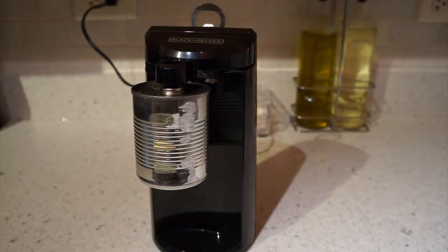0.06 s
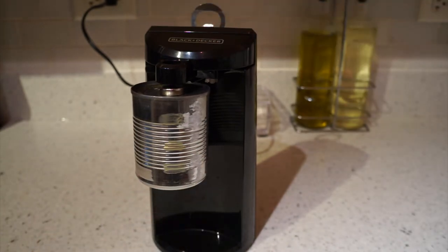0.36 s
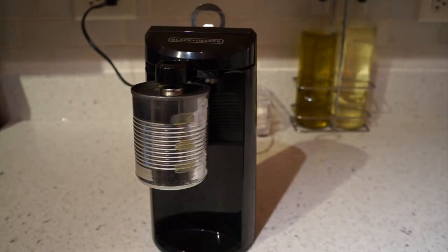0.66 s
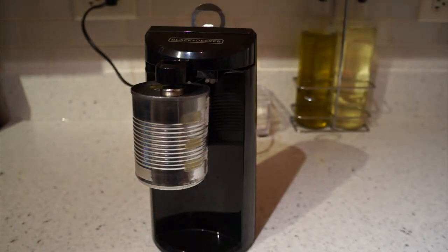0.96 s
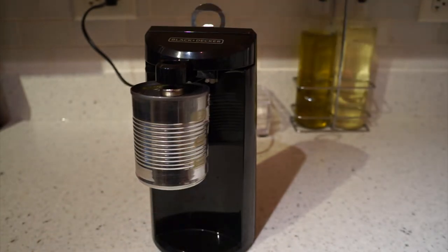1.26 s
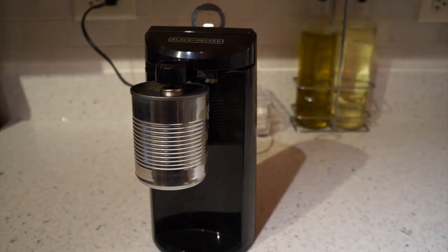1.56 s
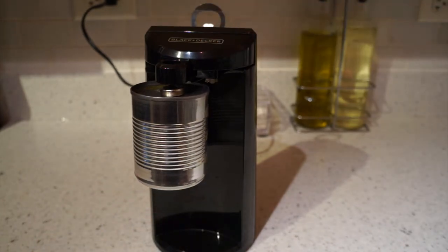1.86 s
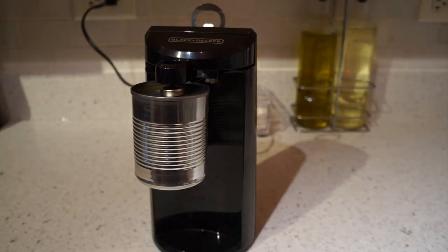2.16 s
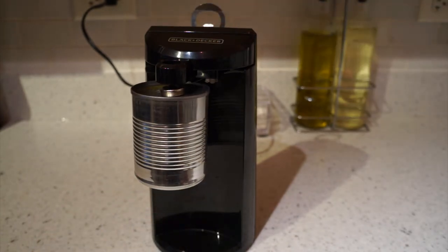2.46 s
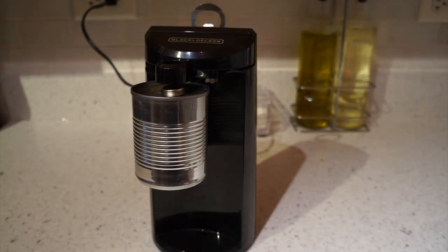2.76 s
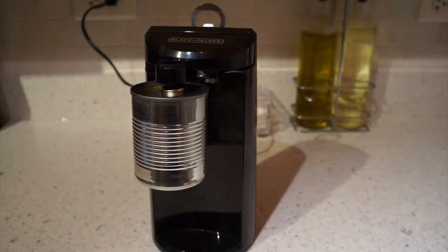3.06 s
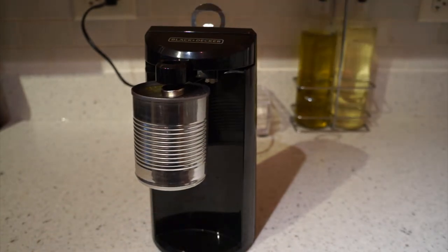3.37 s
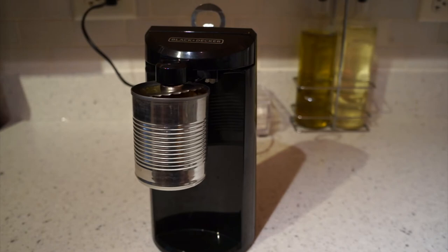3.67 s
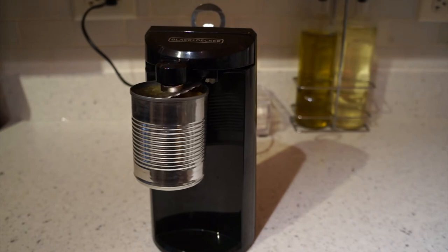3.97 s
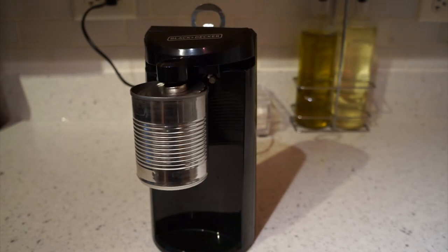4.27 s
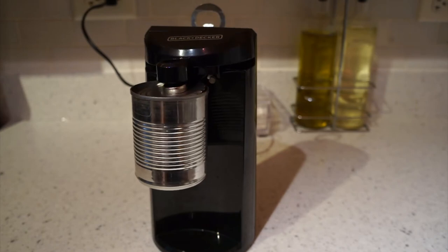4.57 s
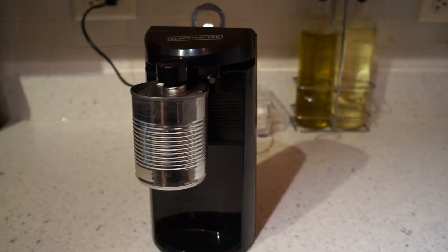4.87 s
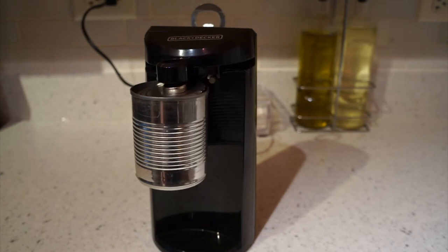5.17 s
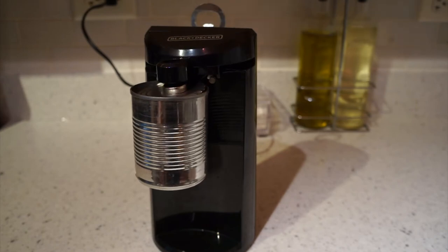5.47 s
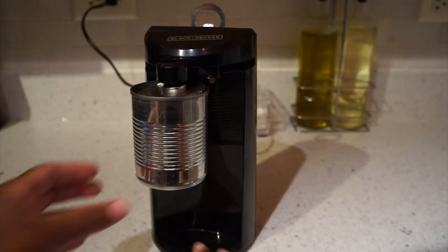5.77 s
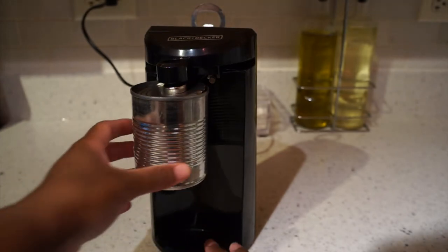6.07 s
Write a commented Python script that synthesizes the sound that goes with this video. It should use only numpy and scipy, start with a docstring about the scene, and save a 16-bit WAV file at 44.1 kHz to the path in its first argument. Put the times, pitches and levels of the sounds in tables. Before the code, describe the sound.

An electric can opener is already cutting a tin at the start, heard close up in a kitchen with short reflections. Its gears make a loud, fast rattle and a fluttering whine over a buzzing motor hum, all steady in pitch. The whine grows a little stronger from about 3 seconds. At 3.8 seconds the blade breaks the rim with a dry tick. At 4 seconds the lid snaps free with a bright crack and a short, thin steel ring, and the motor cuts out. The gears coast down with a falling whine, a loose, dulling rattle and a low rumble, stopping by about 5.8 seconds. Around 6 seconds a hand makes a few soft, dull knocks on the hollow plastic housing, the strongest just after 6.1 seconds, then briefly slides over it. Faint room tone lies underneath throughout.

```python
"""An electric can opener cuts a tin in a kitchen: its gear teeth rattle and whine, its mains motor hums.
The blade breaks the rim with a tick, the lid snaps free and rings, and the current stops.
The gears coast down with a falling whine and a low rumble.
Then a hand knocks on the hollow plastic housing and slides over it. Faint room tone lies under it all."""
import sys
import numpy as np
from scipy import signal
from scipy.fft import rfft, irfft, next_fast_len
from scipy.io import wavfile
from scipy.ndimage import uniform_filter1d, map_coordinates

SR = 44100
rng = np.random.default_rng(int(sys.argv[2]) if len(sys.argv) > 2 else 0)


def dump_mix(stems):
    """Bounce the given channels to the path in sys.argv[1] as a 16-bit WAV at rate SR."""
    frames = np.atleast_2d(stems).T  # one column per channel
    limited = np.clip(frames, -1, 1)  # hard clip at full scale
    pcm = np.round(limited * 32767).astype(np.int16)
    wavfile.write(sys.argv[1], SR, pcm)


N = 279153

# Shaft labouring in the cut. Each row: time in seconds, speed in turns per second.
CUTTING_SPEED = [(0.0, 53.48), (0.22, 53.29), (0.45, 53.52), (0.58, 53.3), (0.7, 53.37), (1.0, 53.46),
                 (1.2, 53.33), (1.55, 53.48), (1.74, 53.72), (1.92, 53.47), (2.36, 53.64), (2.52, 53.36),
                 (2.95, 53.36), (3.05, 53.58), (3.3, 53.66), (3.52, 53.56), (3.7, 53.73), (3.95, 53.76)]
# Tooth impacts under load. Each row: frequency in Hz, relative level in dB.
LOADED_SPECTRUM = [(15, -62), (40, -17), (90, -9.5), (170, -5), (370, 3), (520, -4), (740, -1.5), (1000, 5),
                   (1700, 0), (2700, -2.5), (3400, -2), (5200, -15.5), (7200, -22), (8500, -24.5),
                   (10800, -28.5)]
# Tooth impacts running free. Each row: frequency in Hz, relative level in dB.
FREE_SPECTRUM = [(40, -35), (120, -21.5), (220, -9.5), (320, -17.5), (410, -11.5), (520, -21.5),
                 (750, -13.5), (1000, -13), (1220, 0), (1340, -6.5), (1460, 0.5), (1560, -2), (1700, -12),
                 (1870, -2.5), (2020, -11), (2400, -18), (2540, -5), (2750, -9.5), (2950, -8), (3300, -13),
                 (4500, -26.5), (7000, -37.5), (10800, -48)]
# Housing resonances and dips. Each row: centre in Hz, width in Hz, gain in dB.
HOUSING_RESONANCES = [(198, 75, 11), (1080, 79, -7.5), (1294, 79, 13.5), (1560, 89, -1.5), (1733, 110, 3),
                      (1943, 180, 3.5), (2155, 65, 5.5), (2475, 220, -7), (3077, 125, 6), (3210, 175, 4.5),
                      (3756, 52, 8), (3983, 172, -11), (4450, 700, 3), (7250, 260, 7.5), (9860, 290, 2.5)]
# Gear tones under load. Each row: shaft multiple, level in dB.
LOADED_TONES = [(1, -57), (3, -51.5), (4, -45), (6, -42), (8, -39), (10, -51), (16, -33.5), (17, -49),
                (18, -31.5), (25, -34.5), (26, -53.5), (27, -47.5), (29, -54), (31, -38), (32, -40),
                (35, -46), (37, -66), (40, -36.5), (42, -41), (48, -49.5), (56, -40.5)]
# Whines in the cut. Each row: time in seconds, relative gear level in dB, magnetic contour in dB.
WHINE_LEVELS = [(0.03, -28.5, -27.5), (1.03, -35, -25.5), (1.18, -32, -26.5), (2.29, -30, -27),
                (2.8, -29.5, -26.5), (3.25, -23, -26), (3.56, -22.5, -27), (3.9, -25.5, -26.5),
                (3.95, -33, -37)]
# High teeth on the wheel. Each row: position in teeth, whine surge in dB, half length in seconds.
HIGH_TEETH = [(0, -17.5, .005), (8.5, -23.5, .003), (22.5, -22, .004)]
# Gear tones when coasting. Each row: shaft multiple, relative level in dB.
COASTING_TONES = [(5, -4), (8, -3), (16, -1), (24, 0.5), (26, -4), (32, -6), (40, -2.5), (42, -9), (48, -4),
                  (56, -7), (64, -9), (72, -5), (80, -9), (88, -10)]
# Low rumble of the coasting gears. Each row: frequency in Hz, relative level in dB.
RUMBLE_SPECTRUM = [(110, -36), (160, -26), (250, -12), (330, 9.5), (430, 2.5), (560, -6), (1000, -22),
                   (3000, -71.5)]
# Motor field tones. Each row: shaft multiple (rounded for pitch), mains multiple, base level in dB.
MAGNETIC_TONES = [(2, 0, -38), (0, 2, -45), (6, -2, -38), (0, 4, -40.5), (3, 2, -46), (0, 6, -38.5),
                  (0, 8, -57), (8.23, 2, -50), (0, 10, -40.5), (7.89, 4, -62), (16, 2, -36), (18, 2, -30.5),
                  (20, 2, -45), (31, 2, -49)]
# Blade breaking the rim. Each row: start in seconds, level in dB.
RIM_TICKS = [(3.7725, -17), (3.7759, -16)]
# Clamped rim. Each row: frequency in Hz, relative level in dB, T60 in seconds.
RIM_MODES = [(2050, -11, .035), (2966, -9, .05), (3650, -13, .04), (4650, -13, .05), (7300, -16, .06)]
# Lid and cutter snaps. Each row: start in seconds, level in dB, ring offset in dB.
LID_SNAPS = [(3.9775, -11, -2), (3.9823, -12.5, 2), (4.001, -13, 2.5)]
# Crack of steel. Each row: frequency in Hz, relative level in dB.
SNAP_SPECTRUM = [(100, -27), (900, -8), (1700, -3), (2300, 7.5), (3300, 5), (4500, 1), (6000, 0.5),
                 (7600, -1), (9000, -4), (10800, -5.5)]
# Lid and cutter ring. Each row: frequency in Hz, relative level in dB, T60 in seconds.
LID_MODES = [(2060, -1, .35), (2153, 2, .4), (2240, 1, .35), (2366, 4, .4), (2520, -1, .32), (2640, -3, .4),
             (3135, -1, .4), (3290, -2, .3), (3375, -1, .3), (3898, -7, .29), (4300, -9, .6),
             (5530, -20, 1.3), (6850, -1, .25)]
# Hand on the housing. Each row: start in seconds, level in dB.
HAND_KNOCKS = [(5.955, -49), (6.029, -37), (6.036, -32.5), (6.087, -36.5), (6.1012, -36.5), (6.143, -19.5)]
# Knock on plastic. Each row: frequency in Hz, relative level in dB.
KNOCK_SPECTRUM = [(40, -18), (100, 1), (220, -11), (330, -10), (480, -7), (700, -6), (1300, -3.5),
                  (1800, -11.5), (2700, -13.5), (4500, -23.5), (7500, -26), (11000, -40)]
# Hollow housing. Each row: frequency in Hz, relative level in dB, T60 in seconds.
HOLLOW_MODES = [(255, -20, .22), (320, -13, .28), (440, -17, .18), (620, -20, .12)]
# Skin on plastic. Each row: frequency in Hz, relative level in dB.
SLIDE_SPECTRUM = [(59, -34), (100, -8), (170, -13), (215, -23), (420, -7.5), (837, -36), (1020, -13.5),
                  (2570, -20), (11000, -31), (14300, -57), (22000, -120)]
# Room noise. Each row: frequency in Hz, relative level in dB.
ROOM_SPECTRUM = [(25, -12), (55, -7.5), (120, -14.5), (160, -1), (200, -10), (320, -7.5), (650, -21.5),
                 (1500, -25.5), (4000, -32), (7000, -38), (9700, -36), (11000, -38)]
# Steady room tones. Each row: frequency in Hz, level in dB.
ROOM_LINES = [(156, -62), (242, -59), (3908, -80)]
# Faint whistles. Each row: centre in seconds, half length in seconds, frequency in Hz, level in dB.
WHISTLES = [(5.22, .1, 9450, -73), (5.85, .11, 9400, -72), (5.89, .1, 5100, -75)]
# Stereo width. Each row: frequency in Hz, side gain in dB.
STEREO_WIDTH = [(40, -19), (90, -14), (250, -7.5), (550, -3), (1200, -4.5), (4500, -7.5), (8000, -19)]
# Stereo balance. Each row: frequency in Hz, left minus right in dB.
STEREO_BALANCE = [(50, -2.0), (900, -2.3), (1200, .3), (2000, -.2), (4000, .7), (10000, .3)]

MAINS_HZ, FULL_SPEED_RPS, SWITCH_OFF_S = 60, 53.533, 3.978
PINION_TEETH, WHEEL_TEETH = 8, 80


def gear_rattle(turns, speed_rps, powered, free_db, loaded_db=-24.5, tick_db=-26, soft_rps=13.7):
    """Tooth impacts ring the housing: hard under load, then loose and duller as the gears slow."""
    loaded = tooth_impacts(turns, speed_rps, wear_db=-0.33, jitter_db=0.04, backlash=1.0)
    loaded = rms_one(disperse(loaded, delay_s=0.003001) * tooth_load(turns))
    free = tooth_impacts(turns, speed_rps, wear_db=0.5, jitter_db=2.4, backlash=0.8)
    free = rms_one(disperse(free, delay_s=0.004))
    catches_s = np.flatnonzero(np.diff(np.floor(wheel_turns(turns)))) / SR
    ticks = bursts([(s, tick_db) for s in catches_s], t60_s=0.016)
    loaded = colour(powered * (loaded * from_db(loaded_db) + ticks), loaded_housing_db)
    loosened = ramp(start_s=2.8, length_s=0.55)  # the tin's thrum fades as the lid loosens
    loaded += lowpass(loaded, order=1, top_hz=307) * (from_db(-7.5 * loosened) - 1)
    free = shaped((1 - powered) * free * from_db(free_db), FREE_SPECTRUM)
    dull = lowpass(free, order=2, top_hz=1720)
    free = dull + (free - dull) * np.tanh((speed_rps / soft_rps) ** 2)
    return kitchen(loaded + free, near_db=-4, far_db=-4.5)


def tooth_impacts(turns, speed_rps, wear_db, jitter_db, backlash):
    """One impact per tooth; the wheel's wear pattern repeats and backlash adds a rebound."""
    at = np.flatnonzero(np.diff(np.floor(turns * PINION_TEETH)))
    tooth = np.arange(len(at)) % WHEEL_TEETH
    wear, polarity = rng.standard_normal((2, WHEEL_TEETH))
    jitter, lag, bounce = np.clip(rng.standard_normal((3000, 3))[:len(at)], -1.6, 1.6).T
    period_s = 1 / (PINION_TEETH * speed_rps[at])
    size = from_db(wear_db * wear[tooth] + jitter_db * jitter) * np.sqrt(period_s)
    firm = clicks(at / SR, size * np.sign(polarity[tooth]))
    rebound = clicks(at / SR + period_s * np.abs(lag) / 2, size * bounce)
    return rms_one(firm + backlash * rebound)


def tooth_load(turns, tight_tooth=54):
    """Tooth force buzzes at twice mains rate, pulses with the shaft and throbs with the oval wheel."""
    wheel = wheel_turns(turns)
    buzz_db = 1.4 * np.sin(2 * np.pi * 2 * MAINS_HZ * seconds_since(0))
    pulse_db = 0.8 * np.sin(2 * np.pi * wheel * WHEEL_TEETH / PINION_TEETH)
    oval_rad = 2 * np.pi * (wheel - tight_tooth / WHEEL_TEETH)
    throb_db = 0.8 * (np.cos(oval_rad) / 2 + np.cos(2 * oval_rad))
    return from_db(buzz_db + pulse_db + throb_db + 0.09 * drift(21.87))


def loaded_housing_db(hz):
    """Loaded impact spectrum through the housing's resonances."""
    resonance_db = sum(db / (1 + (2 * (hz - centre_hz) / width_hz) ** 2)
                       for centre_hz, width_hz, db in HOUSING_RESONANCES)
    return at_hz(LOADED_SPECTRUM, hz) + resonance_db


def disperse(x, delay_s):
    """The casing delays each frequency differently, smearing impacts without colouring them."""
    size = next_fast_len(N + SR // 4)
    hz = np.fft.rfftfreq(size, 1 / SR)
    delays_s = np.interp(hz, np.linspace(0, SR / 2, 300), delay_s * rng.exponential(1, 300))
    return irfft(rfft(x, size) * np.exp(-2j * np.pi * np.cumsum(delays_s) * SR / size), size)[:N]


def cutting_whine(turns, powered, whine_db, main_order=24, pressing_tooth=6.2):
    """Shaft harmonics; the main one flutters with the off-centre pinion and surges at high teeth."""
    unsteady = turns + 0.001 * drift(45)
    wheel, surge = wheel_turns(turns), 0
    for tooth, level_db, half_s in HIGH_TEETH:
        offset_turns = (wheel - tooth / WHEEL_TEETH + 0.5) % 1 - 0.5
        offset_s = offset_turns * WHEEL_TEETH / PINION_TEETH / FULL_SPEED_RPS
        surge += from_db(level_db) * bell(offset_s / half_s)
    flutter = 1 + 0.55 * np.cos(2 * np.pi * (wheel * WHEEL_TEETH - pressing_tooth) / PINION_TEETH)
    steady = flutter * from_db(whine_db - 1.5 + 1.6 * drift(70))
    surge *= from_db(2.3 * drift(9.65))
    out = tone(main_order * unsteady, np.hypot(steady, surge), spread_rad=0.26)
    for order, level_db in LOADED_TONES:
        out += tone(order * unsteady, from_db(level_db + 1.3 * drift(21.86)), spread_rad=0.39)
    return powered * out


def coasting_whine(turns, speed_rps, free_db, critical_rps=30.3, width_rps=1.3, rise_s=0.15):
    """Mesh harmonics glide down through the housing's resonances and swell at a critical speed."""
    singing_db = free_db + 3.8 + 5.5 / (1 + ((speed_rps - critical_rps) / width_rps) ** 2)
    out = 0
    for order, level_db in COASTING_TONES:
        resonance_db = 1.19 * at_hz(FREE_SPECTRUM, order * speed_rps)
        gain = from_db(singing_db + level_db + resonance_db + 2.6 * drift(35))
        backlash_cycles = 0.15 * drift(60)
        out += tone(order * turns + backlash_cycles, gain, spread_rad=0.29)
    return (1 - np.exp(-seconds_since(SWITCH_OFF_S) / rise_s)) * out


def coasting_rumble(turns, speed_rps, powered, crawl_rps=9.3, width_rps=7.5):
    """Low rumble of the coasting gears: it fades, then swells at 300-450 Hz as they slow to a crawl."""
    throb = 1 + 0.2 * np.sin(2 * np.pi * turns)
    crawl = bell((speed_rps - crawl_rps) / width_rps) * np.tanh(speed_rps)
    gain = from_db(-39.5) * (speed_rps / FULL_SPEED_RPS) ** 3.7 + from_db(-45.5) * crawl
    rumble = shaped(rng.standard_normal(N) * throb * (1 - powered) * gain, RUMBLE_SPECTRUM)
    return kitchen(rumble, near_db=-27, far_db=-24)


def coasting_db(turns, speed_rps, knee_rps=31):
    """Free gear level: the rotor shakes the teeth once a turn; below the knee they stop bouncing."""
    return -28 - 20 * np.log10(1 + (knee_rps / speed_rps) ** 2.36) + 0.5 * np.sin(2 * np.pi * turns)


def shaft_speed_rps(drag_s=1.54, friction_rps_per_s=14.6):
    """The shaft wavers on uneven steel; after switch-off, drag and dry friction stop it."""
    cutting = in_time(CUTTING_SPEED)[0] + 0.06 * drift(20)
    off_s = seconds_since(SWITCH_OFF_S)
    braking_rps = friction_rps_per_s * drag_s
    coasting = (FULL_SPEED_RPS + braking_rps) * np.exp(-off_s / drag_s) - braking_rps
    return np.where(off_s > 0, np.maximum(coasting, 1e-3), cutting)


def wheel_turns(turns, catch_s=1.206):
    """Turns of the big wheel, a whole number whenever its highest tooth meshes."""
    return (turns - np.interp(catch_s * SR, np.arange(N), turns)) * PINION_TEETH / WHEEL_TEETH


def motor_hum(turns, powered, magnetic_db):
    """The field pulls at even mains multiples, shifted by shaft multiples; load lifts the high tones."""
    mains_cycles = MAINS_HZ * seconds_since(0)
    load_db = 3 + 1.9 * (magnetic_db - np.average(magnetic_db, weights=powered))
    out = 0
    for order, multiple, level_db in MAGNETIC_TONES:
        gain = powered * from_db(level_db + load_db * (order > PINION_TEETH) + 1.43 * drift(12))
        out += tone(round(order) * turns + multiple * mains_cycles, gain, spread_rad=0.62)
    return out


def rim_tick():
    """The blade breaks the last strip of rim: a dry double tick with a short steel ring."""
    crack = shaped(from_db(-1) * bursts(RIM_TICKS, t60_s=0.012), SNAP_SPECTRUM)
    return kitchen(crack + struck(RIM_TICKS, RIM_MODES), near_db=-6, far_db=-8)


def lid_snaps():
    """Lid and cutter snap: bright cracks, then the shimmer and modes of thin steel."""
    hits = [(s, db) for s, db, _ in LID_SNAPS]
    rings = [(s, db + ring_db) for s, db, ring_db in LID_SNAPS]
    crack = from_db(-1.5) * bursts(hits, t60_s=0.019)
    shimmer = from_db(-15.5) * bursts(rings, t60_s=0.37)
    ring = from_db(-25.5) * struck(rings, LID_MODES)
    return kitchen(shaped(crack + shimmer, SNAP_SPECTRUM) + ring, near_db=-6, far_db=1)


def hand(slide_s=6.145, attack_s=0.047, fade_db_per_s=31):
    """Dull knocks ring the hollow plastic housing, then skin slides over it."""
    thuds = from_db(-2) * bursts(HAND_KNOCKS, t60_s=0.038)
    tails = from_db(-20.5) * bursts(HAND_KNOCKS, t60_s=0.3)
    knocks = shaped(thuds + tails, KNOCK_SPECTRUM) + struck(HAND_KNOCKS, HOLLOW_MODES)
    slide_db = -42 - fade_db_per_s * seconds_since(slide_s + attack_s) + 0.98 * drift(79)
    friction = ramp(slide_s, attack_s) * from_db(slide_db) * rng.standard_normal(N)
    return kitchen(knocks + shaped(friction, SLIDE_SPECTRUM), near_db=-3.5, far_db=-9)


def kitchen(x, near_db, far_db):
    """Direct sound, quick reflections off counter and wall, and the room's tail."""
    near = from_db(near_db) * scatter(x, t60_s=0.055)
    far = from_db(far_db) * scatter(x, t60_s=0.43)
    return x + near + far


def scatter(x, t60_s):
    """Dense reflections: convolution with decaying stereo noise, level across bands."""
    size = SR // 2
    tail = rfft(rng.standard_normal((2, size)) * from_db(-60 * np.arange(size) / SR / t60_s))
    tail /= np.sqrt(uniform_filter1d(np.abs(tail) ** 2, size=60, axis=1) + 1e-9)
    return signal.fftconvolve(np.atleast_2d(x), irfft(tail)[:, :size - SR // 20], axes=1)[:, :N]


def room_tone():
    """Low rumble, thin hiss, faint steady tones and brief whistles."""
    time_s = seconds_since(0)
    noise = rng.standard_normal(N) + 0.94 * rng.standard_normal((2, N))
    out = from_db(-52) * shaped(noise, ROOM_SPECTRUM)
    for hz, db in ROOM_LINES:
        out += tone(hz * time_s, from_db(db + 1.8 * drift(4.2)), spread_rad=0.086)
    for centre_s, half_s, hz, db in WHISTLES:
        gain = from_db(db) * bell((time_s - centre_s) / half_s)
        out += tone(hz * time_s + drift(20), gain, spread_rad=0.086)
    return out


def tone(cycles, rms, spread_rad):
    """Stereo sine, its phase offset in opposite directions left and right."""
    offset_rad = spread_rad * rng.choice([-1, 1]) * np.array([[1], [-1]])
    return np.sqrt(2) * rms * np.sin(2 * np.pi * (cycles + rng.random()) + offset_rad)


def clicks(times_s, sizes):
    """One impulse per contact."""
    return np.bincount((times_s * SR).astype(int), sizes, N)[:N]


def bursts(hits, t60_s):
    """A decaying noise burst per hit."""
    times_s, levels_db = np.transpose(hits)
    decay = from_db(-60 / (t60_s * SR))
    envelope = signal.lfilter([1], [1, -decay], clicks(times_s, from_db(levels_db)) + 1e-18)
    return envelope * rng.standard_normal(N)


def struck(hits, modes):
    """Each hit rings a set of damped modes."""
    times_s, levels_db = np.transpose(hits)
    age_s = np.arange(SR) / SR
    ring = sum(from_db(db - 60 * age_s / t60_s) * np.sin(2 * np.pi * hz * age_s)
               for hz, db, t60_s in modes)
    return signal.fftconvolve(clicks(times_s, from_db(levels_db)), ring)[:N]


def colour(x, db_at):
    """Minimum-phase filter of shape db_at(hz) and unit power gain."""
    size = next_fast_len(N + SR // 4, real=True)
    size += size % 2
    gain = rms_one(from_db(db_at(np.fft.rfftfreq(size, 1 / SR))))
    cepstrum = irfft(np.log(gain))
    cepstrum[1:size // 2] *= 2
    cepstrum[size // 2 + 1:] = 0
    return irfft(rfft(x, size) * np.exp(rfft(cepstrum)))[..., :N]


def shaped(x, spectrum):
    """Filter by a spectrum table."""
    return colour(x, lambda hz: at_hz(spectrum, hz))


def lowpass(x, order, top_hz):
    return signal.sosfilt(signal.butter(order, top_hz, fs=SR, output="sos"), x)


def at_hz(spectrum, hz):
    """Read a spectrum on a log-frequency axis."""
    knots_hz, db = np.transpose(spectrum)
    return np.interp(np.log(np.maximum(hz, 1)), np.log(knots_hz), db)


def in_time(rows):
    """Each column of a timed table at every sample."""
    times_s, *columns = np.transpose(rows)
    return [np.interp(seconds_since(0), times_s, column) for column in columns]


def drift(rate_hz):
    """Smooth random curve of rms 1."""
    knots = rng.standard_normal(4000)
    curve = map_coordinates(knots, [np.arange(0, N, 32) / SR * rate_hz], order=3, mode="wrap")
    return rms_one(curve).repeat(32)[:N]


def seconds_since(start_s):
    return np.maximum(np.arange(N) / SR - start_s, 0)


def ramp(start_s, length_s):
    return np.minimum(seconds_since(start_s) / length_s, 1)


def bell(x):
    return np.exp(-np.minimum(x ** 2, 20))


def from_db(db):
    return 10 ** (np.asarray(db) / 20)


def rms_one(x):
    return x / np.sqrt(np.mean(x ** 2) + 1e-20)


def scene():
    """Shaft speed and switch drive gears and motor; rim, lid, hand and room are added."""
    speed_rps = shaft_speed_rps()
    turns = np.cumsum(speed_rps) / SR
    powered = np.clip((SWITCH_OFF_S - seconds_since(0)) / 0.018 + 0.5, 0, 1)
    whine_db, magnetic_db = in_time(WHINE_LEVELS)
    free_db = coasting_db(turns, speed_rps)
    rattle = gear_rattle(turns, speed_rps, powered, free_db)
    whine = cutting_whine(turns, powered, whine_db) + coasting_whine(turns, speed_rps, free_db)
    hum = motor_hum(turns, powered, magnetic_db)
    rumble = coasting_rumble(turns, speed_rps, powered)
    return rattle + whine + hum + rumble + rim_tick() + lid_snaps() + hand() + room_tone()


def record(dry, cutoff_hz=11030):
    """Image widest in the midrange, bass leaning right, top cut steeply."""
    size = next_fast_len(N + SR // 4)
    hz = np.fft.rfftfreq(size, 1 / SR)
    pair = rfft(dry, size)
    mid = pair.mean(axis=0)
    pair = mid + (pair - mid) * from_db(at_hz(STEREO_WIDTH, hz))
    pair *= from_db(at_hz(STEREO_BALANCE, hz) * np.array([[0.5], [-0.5]]))
    top_cut = signal.ellip(12, 0.1, 90, cutoff_hz, fs=SR, output="sos")
    return signal.sosfilt(top_cut, irfft(pair, size)[:, :N])


dry = scene()
out = record(dry)
dump_mix(out)
```